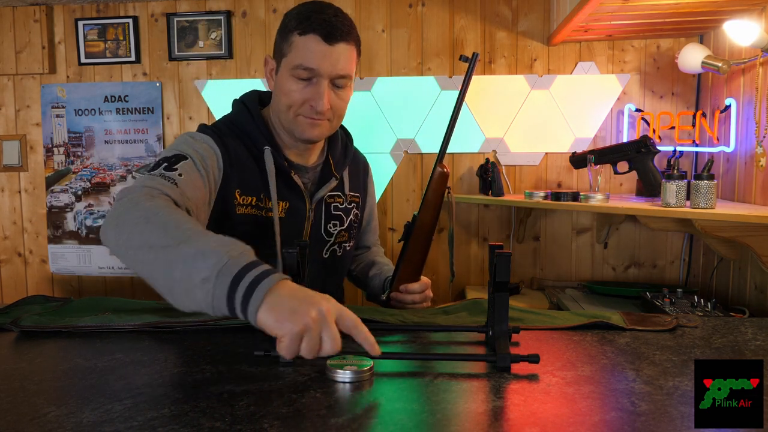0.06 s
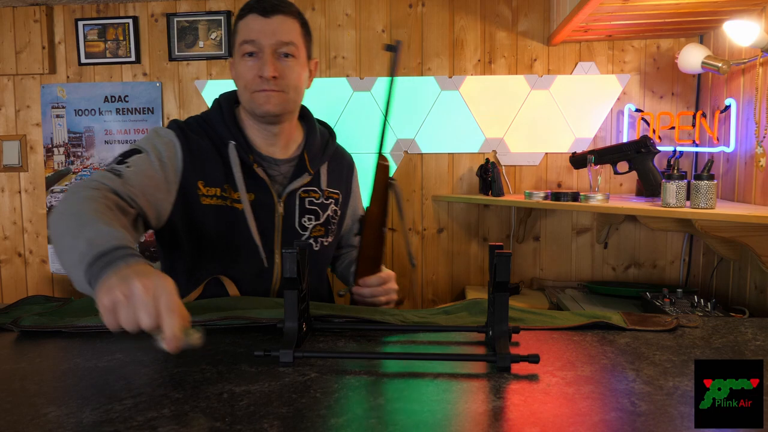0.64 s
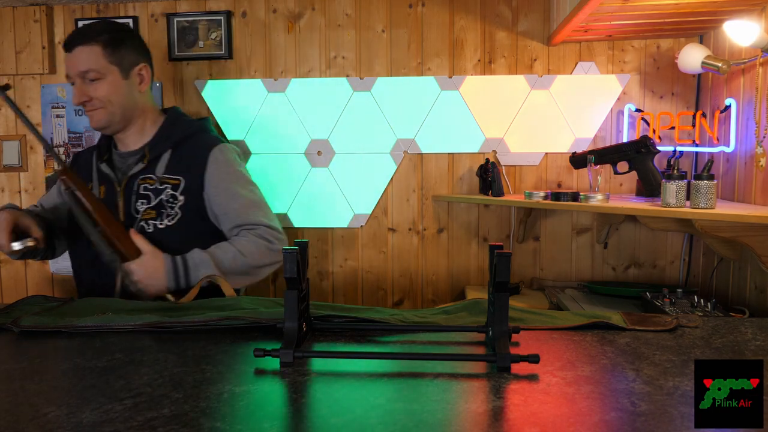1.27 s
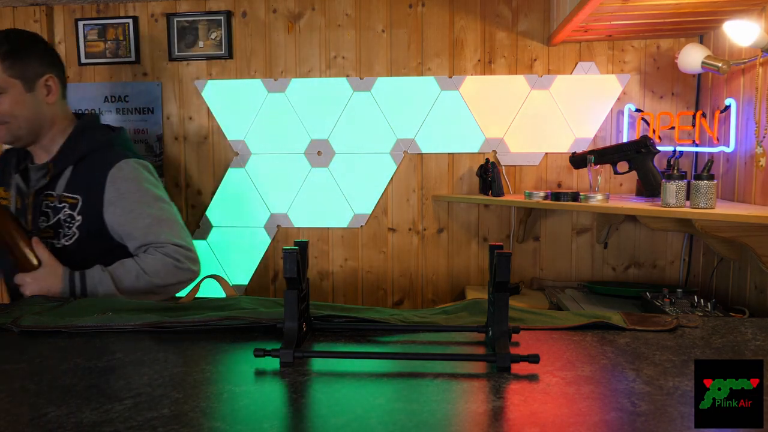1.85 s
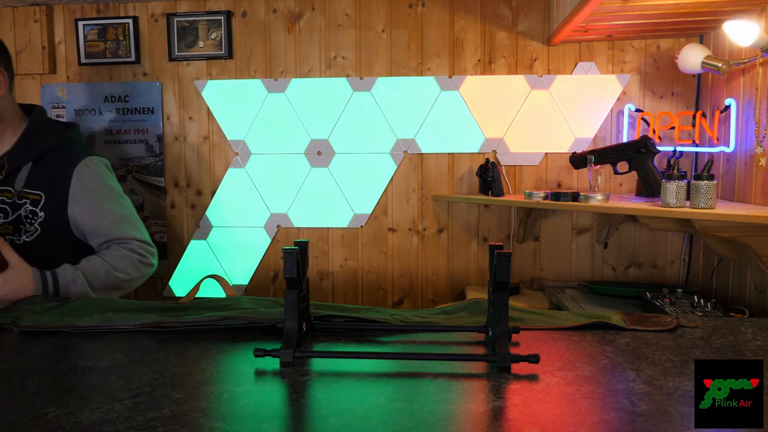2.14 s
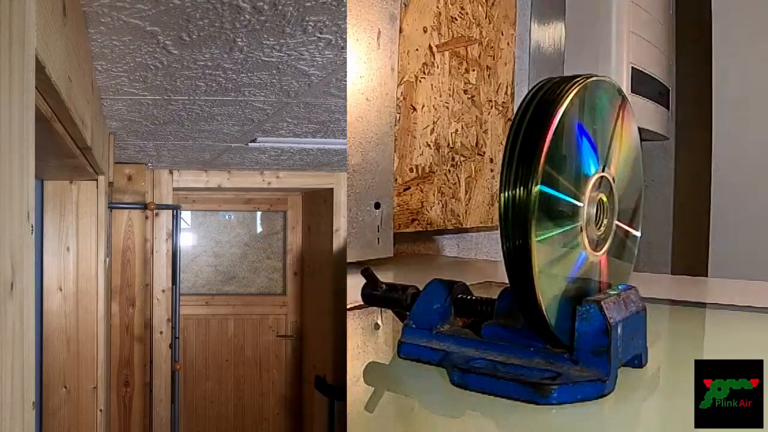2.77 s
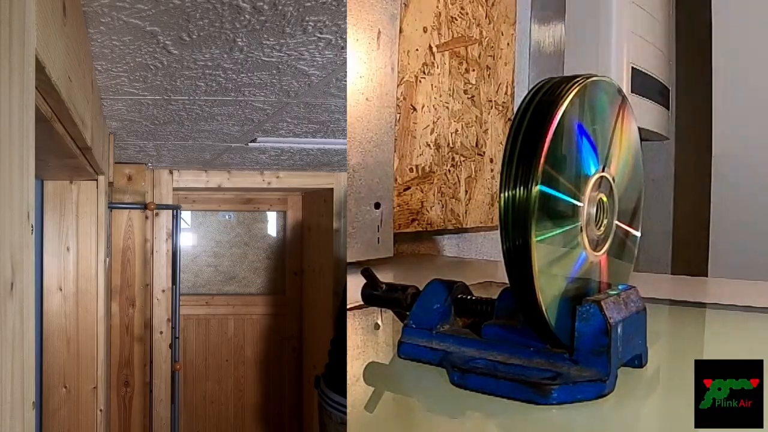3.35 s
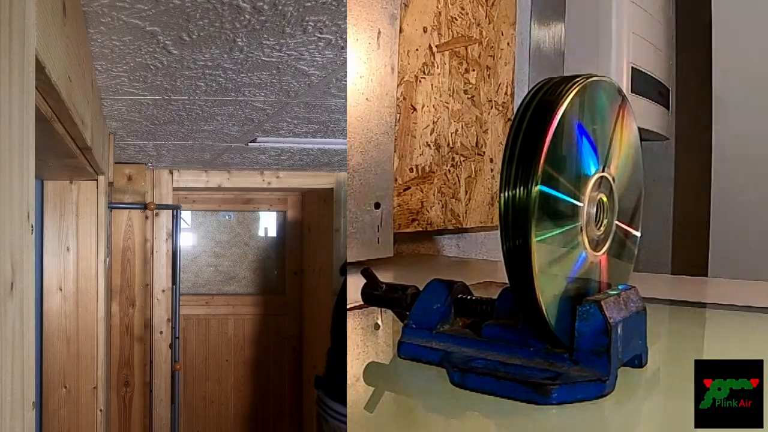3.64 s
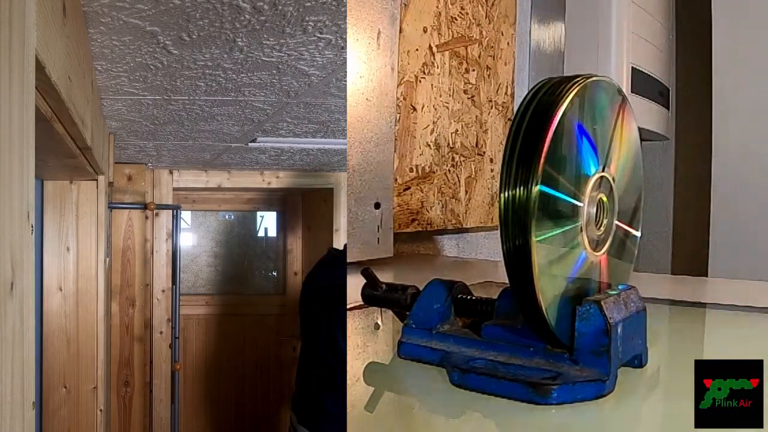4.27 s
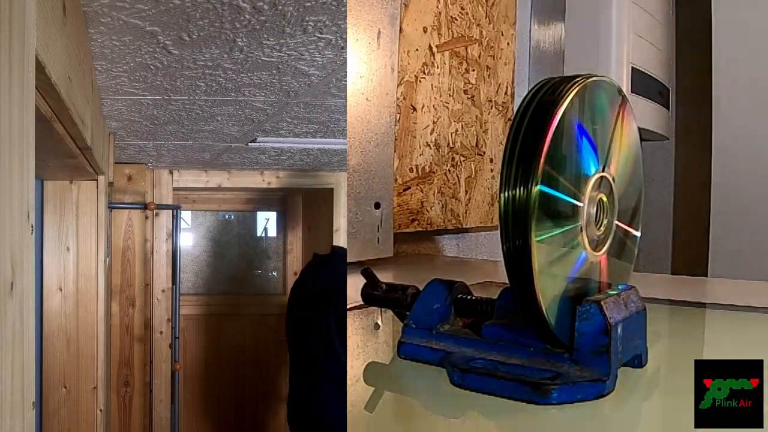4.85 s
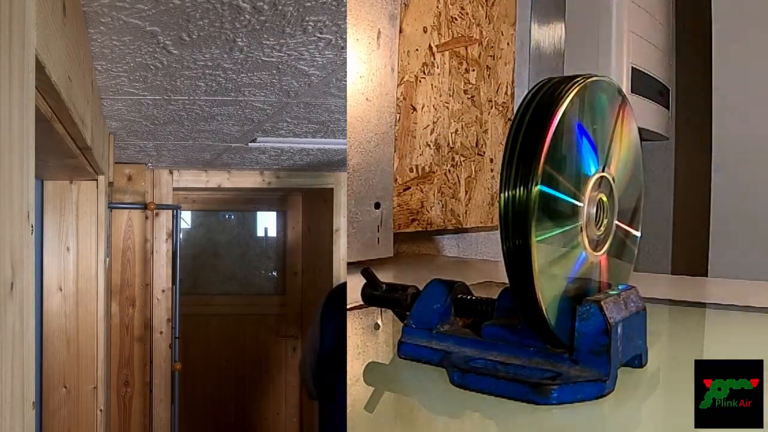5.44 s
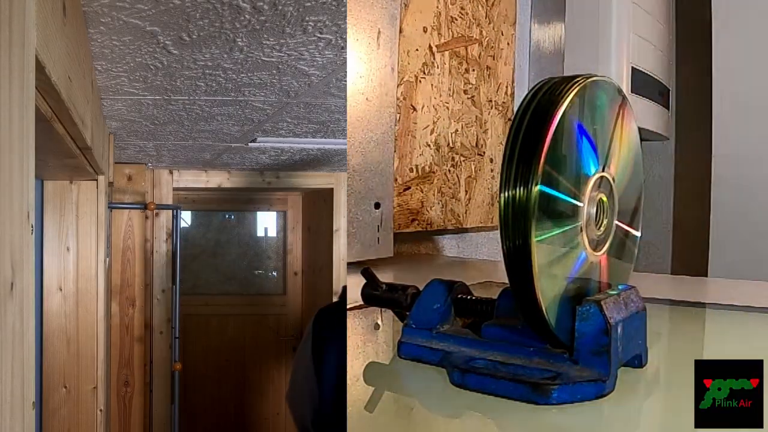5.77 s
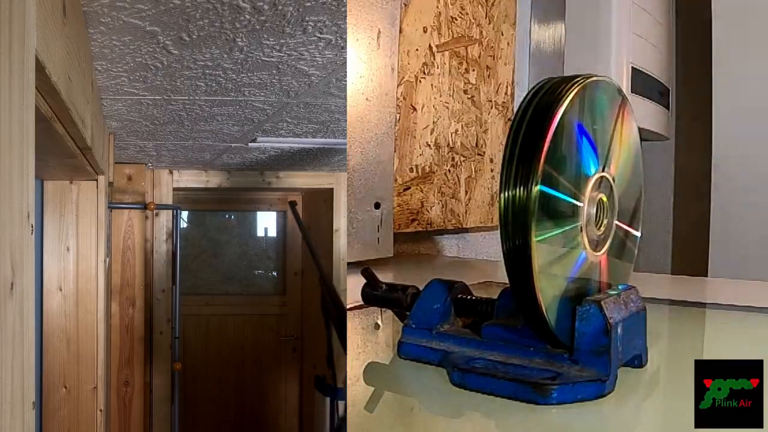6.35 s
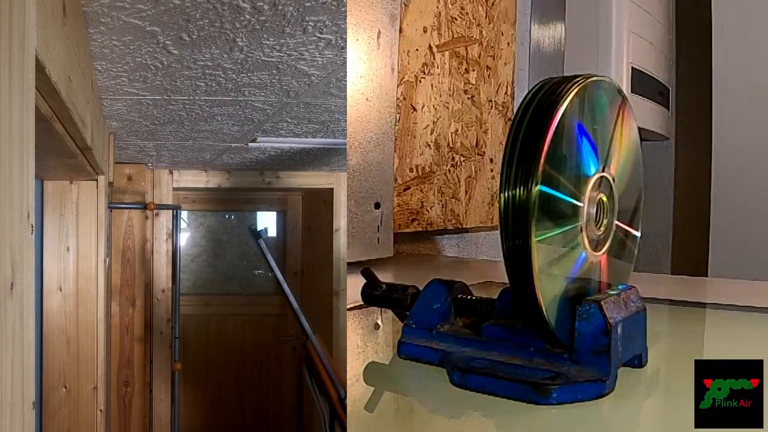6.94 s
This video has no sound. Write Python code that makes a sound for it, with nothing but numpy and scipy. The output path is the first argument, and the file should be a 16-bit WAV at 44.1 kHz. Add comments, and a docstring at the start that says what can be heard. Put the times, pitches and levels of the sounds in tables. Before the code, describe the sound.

A small tin of pellets scrapes and rattles softly, then an air rifle gives a hard knock, a metallic clatter and a latch snap.

```python
"""A pellet tin and an air rifle

In a small wood-panelled room a man slides a tin of pellets off a table and walks away with an air rifle. The
tin scrapes, pellets tick against its wall, sleeves rub his jacket, and steps and soft bumps thud. Cloth flicks
faintly now and then as he walks. Then the rifle is worked, and its steel parts strike, bounce and ring: one
hard knock, a quick clatter with a ping of the spring, a rattling lever and a latch snapping shut."""
import sys
import numpy as np
from scipy import signal
from scipy.fft import rfft, irfft
from scipy.io import wavfile
from scipy.ndimage import uniform_filter1d

SR = 44100
rng = np.random.default_rng(int(sys.argv[2]) if len(sys.argv) > 2 else 0)


def log_audio(samples):
    """Write samples as a 16-bit WAV file to the path given in sys.argv[1]."""
    # one column per channel
    frames = np.atleast_2d(samples).T
    # limit to full scale, then quantise
    limited = np.clip(frames, -1, 1)
    pcm = np.round(limited * 32767).astype(np.int16)
    wavfile.write(sys.argv[1], SR, pcm)


N = 308700
TIME = np.arange(N) / SR
HIT_SAMPLES = 16384
HIT_TIME = np.arange(HIT_SAMPLES) / SR

# Levels are relative: the functions set the final mix. A ring_s is the time to fade by 60 dB.
# the tone of the room's still air: pitch_hz, level_db
AIR_TONE = [(12, -14), (20, 5), (44, 9), (91, -3), (255, -2), (357, -4), (738, -7), (1220, -5),
            (1440, -10.5), (2990, -14), (7950, -22), (9950, -24.5), (13500, -28.5), (16000, -37)]

# faint stirring of the jacket between sleeve strokes: time_s, level_db
CLOTH_STIR = [(0, -70), (.3, -59.5), (1.85, -59.5), (3.45, -63.5), (4.4, -63.5), (5.4, -58.5), (7, -64)]
# sleeves brushing the jacket: fastest_s, length_s, rub_db, hiss_db
SLEEVE_STROKES = [(.285, .04, -56, -53), (.36, 0.13, -52, -52.5), (0.747, .1, -53.5, -68),
                  (0.902, 0.054, -54.5, -58), (1.17, 0.37, -51, -58), (1.483, 0.12, -55, -57.5),
                  (2.094, 0.19, -44.5, -44), (2.55, 0.48, -53, -55), (2.888, 0.099, -58, -41),
                  (3.011, 0.11, -48, -48), (3.183, 0.18, -49.5, -55), (3.64, 0.24, -58, -64.5),
                  (3.824, .11, -55, -55), (4.574, 0.17, -51.5, -54), (4.913, 0.097, -50, -58),
                  (5.105, 0.24, -55.5, -59), (5.64, 0.22, -53.5, -53.5), (5.772, 0.094, -50, -51),
                  (6.026, 0.17, -69, -58.5), (6.226, 0.075, -59.5, -57.5), (6.462, 0.13, -58, -54.5),
                  (6.561, 0.09, -53, -50), (6.689, 0.042, -54, -59), (6.88, 0.046, -55.5, -54)]
# the dull rub of the cloth: pitch_hz, level_db
RUB_TONE = [(100, -7.5), (250, -4), (400, -7.5), (750, -0.5), (1200, -2), (2200, -5.5), (4000, -18),
            (9000, -34)]
# the bright hiss of its fibres: pitch_hz, level_db
HISS_TONE = [(1200, -13), (2800, 2), (4500, 0.5), (8500, -1.5), (10500, -7.5), (14000, -9), (16000, -19.5)]

# steps and soft bumps: start_s, level_db, pitch_hz, fade_s, thump_db
STEPS_AND_BUMPS = [(.198, -34.5, 760, .019, -44.5), (.333, -31.5, 780, 0.011, -49),
                   (.824, -35, 570, 0.012, -43.5), (1.06, -44, 920, 0.032, -53),
                   (1.18, -35, 965, 0.0088, -49), (1.365, -44, 544, 0.03, -54),
                   (1.826, -41, 640, 0.025, -46.5), (2.518, -45.5, 1700, 0.036, -42.5),
                   (3.22, -49, 470, .035, -49), (3.579, -44.5, 1200, 0.0087, -50.5),
                   (4.98, -50, 120, .038, -61), (5.153, -44, 1200, 0.012, -43.5),
                   (5.17, -47, 110, 0.047, -58), (5.587, -46.5, 446, 0.032, -48),
                   (6.018, -48, 810, 0.013, -72), (6.111, -50.5, 705, 0.028, -49.5),
                   (6.676, -49.5, 1450, 0.031, -57)]
# faint, bright flicks of cloth: start_s, level_db
SMALL_TICKS = [(2.272, -41.5), (3.338, -50), (3.731, -46)]
# how long the room echoes, from bass to treble: pitch_hz, ring_s
ROOM_ECHO = [(100, 0.53), (300, 0.4), (800, 0.28), (2000, 0.29), (6000, 0.3), (14000, 0.31)]

# the tin sliding over the table: time_s, level_db
TIN_SLIDE = [(.252, -59), (.262, -44.5), (.285, -42), (.32, -41), (.34, -33.5), (.356, -40), (.40, -51.5),
             (.43, -59)]
# the tone the tin's body gives the scrape: pitch_hz, level_db
SLIDE_TONE = [(120, -33), (230, 4), (400, -20), (580, -4), (730, 6), (830, 7), (1070, -21), (1380, 3.5),
              (1800, -4.5), (2100, -6), (2500, -8.5), (4500, -14.5), (9000, -16), (15000, -37)]
# the loudest pellet ticks: start_s, level_db, brightness_db_per_octave
PELLET_HITS = [(.2624, -42.5, 6), (.440, -33.5, 0), (.4909, -37.5, 2.5), (.5085, -35, 2), (.5235, -40, 0.5),
               (.5495, -36.5, 2), (.6635, -38.5, -1.5), (.7039, -35.5, 0), (.914, -45, -1), (.9498, -44, 1),
               (.9967, -39, 1.5), (1.0471, -38.5, -1), (1.1115, -39.5, -4), (1.1469, -39.5, 2),
               (1.1808, -40, -8), (1.226, -38.5, -9), (1.4293, -36, -3), (1.438, -38.5, -6),
               (1.4642, -43, -3), (1.5694, -41.5, -2), (1.5914, -34, -3.5), (1.6248, -39, -2)]
# the tone of a pellet hitting the tin: pitch_hz, level_db
PELLET_TONE = [(300, -29), (800, -4.5), (1600, -0.5), (3200, 3), (4000, 0.5), (5500, 4), (8800, 3),
               (10500, -4), (15500, -11.5)]
# the notes the tin rings with: pitch_hz, level_db, ring_s
TIN_NOTES = [(727, 0.5, 0.21), (3040, -13, 0.18), (3020, 0, 0.11), (3390, 7, 0.064), (5370, -7, .12),
             (6500, -17, .12), (6800, -16, .1), (8070, 2, 0.061), (9300, -3, .07)]
# fingers close round the tin and muffle its ring: time_s, ring_db
FINGER_GRIP = [(.55, -6), (.68, -9), (1.4, -23)]
# loose pellets shifting as the tin is carried: time_s, level_db
PELLET_SHIFT = [(.42, -68), (.47, -55.5), (.6, -79), (.7, -53), (.92, -48.5), (1.3, -52.5), (1.5, -50),
                (1.72, -56)]
# the tone of the shifting pellets: pitch_hz, level_db
SHIFT_TONE = [(1500, -16), (3200, -6), (4200, -2), (5500, -0.5), (7500, -5), (9000, 1.5), (10200, -14),
              (15500, -13)]

# the rifle's hard knock: start_s, level_db, brightness_db_per_octave
KNOCK_HITS = [(2.6041, -13, 2), (2.6129, -24, -2), (2.636, -23.5, -0.5)]
# the tone of that knock: pitch_hz, level_db
KNOCK_TONE = [(30, -32), (55, -14), (85, -11), (135, -18), (215, -1), (370, -9.5), (600, 3.5), (740, -3),
              (900, 1), (1080, -7.5), (1400, 1), (2000, -9), (4200, -13.5), (7200, -11.5), (10500, -21.5),
              (16000, -36)]
# the notes the knock sets ringing: pitch_hz, level_db, ring_s
KNOCK_NOTES = [(211, 0.5, 0.14), (500, -5, .16), (630, -3, .13), (900, -6, .15), (1405, 0, 0.096),
               (1700, 4, .1), (2500, 0, 0.17), (4100, -14, .12), (5600, -11, .11), (6500, -9, .14),
               (7580, -1, 0.083), (8650, 1, 0.091)]
# the clatter of the action (the rifle's moving parts): start_s, level_db, brightness_db_per_octave
ACTION_HITS = [(4.0878, -13, 1.1), (4.0905, -13.5, 1), (4.1003, -11.8, 0.7), (4.1235, -18, -1),
               (4.136, -18.5, -0.5), (4.152, -19, -2.5), (4.1788, -12.5, -0.5), (4.2243, -16.5, -0.5),
               (4.243, -24, -2), (4.2495, -18.5, -1), (4.259, -20.5, 0.3)]
# the tone of that clatter: pitch_hz, level_db
ACTION_TONE = [(60, -47), (130, -30), (390, -23), (510, -11.5), (730, -15), (950, -5.5), (1120, -11.5),
               (1650, 1), (2100, -7.5), (3200, -12), (4800, -22), (5600, -32), (7000, -23.5), (11000, -41),
               (16000, -55)]
# the notes the action rings with: pitch_hz, level_db, ring_s
ACTION_NOTES = [(516, -21, 0.4), (630, -8.5, 0.32), (988, 6, .17), (978, -19, 0.24), (1200, 6, 0.173),
                (1440, 1, 0.26), (1620, -22, .2), (1653, -1.5, 0.073), (1760, -12, 0.18), (1890, -1, 0.17),
                (2256, -4, 0.2), (2450, 5, 0.12), (2740, -2, 0.137), (3210, 6, 0.077), (4370, -8.5, 0.058),
                (4970, -1, 0.054), (6700, -19, 0.29)]
# the lever rattling as it is moved: start_s, level_db, brightness_db_per_octave
LEVER_HITS = [(5.2400, -33, 0), (5.2455, -32, -1.5), (5.2605, -32, -3.5), (5.293, -47, -12),
              (5.315, -47, -13)]
# the tone of that rattle: pitch_hz, level_db
LEVER_TONE = [(200, -32), (400, -17.5), (530, -11), (950, -5), (1160, -15), (1500, 6), (1750, -2),
              (2050, -12), (2450, -10), (3100, -21), (4100, -35), (15000, -56)]
# the notes the lever rings with: pitch_hz, level_db, ring_s
LEVER_NOTES = [(890, 1, 0.29), (1430, -7, 0.15), (1590, -9, 0.18), (1770, -4, 0.13), (2326, 4, 0.16)]
# the latch snapping shut: start_s, level_db, brightness_db_per_octave
LATCH_HITS = [(5.335, -50, 13), (5.3502, -31.5, 2), (5.354, -24.5, 0.5), (5.374, -35.5, -3),
              (5.397, -41, -10)]
# the tone of that snap: pitch_hz, level_db
LATCH_TONE = [(150, -16), (380, -21), (540, -7.5), (950, -6), (1150, -3), (1550, 4.5), (2300, -7),
              (3300, -12.5), (4100, -26.5), (5000, -20.5), (8000, -34.5), (15000, -44)]


def gain(db):
    """Turn decibels into a number to multiply a sound by."""
    return 10 ** (np.asarray(db) / 20)


def unit_level(sound):
    """Scale a sound to an average (rms) level of 1."""
    return sound / np.sqrt(np.mean(sound ** 2))


def unit_hit(sound):
    """Give a hit as much energy as 10 ms of sound at level 1."""
    return sound / np.sqrt(np.sum(sound ** 2) / (SR / 100))


def loudness_curve(points):
    """Join (time_s, level_db) points into a gain that is silent before and after them."""
    return gain(np.interp(TIME, *np.transpose(points), left=-120, right=-120))


def at_pitch(points, hz):
    """Read between (pitch_hz, value) points, with octaves evenly spaced."""
    pitches, values = np.transpose(points)
    return np.interp(np.log(hz + 1), np.log(pitches), values)


def shape_tone(sound, tone, brightness=0):
    """Filter a sound to a tone, adding `brightness` dB for each octave above 500 Hz."""
    size = len(sound)
    hz = np.arange(size // 2 + 1) * SR / size
    db = at_pitch(tone, hz) + brightness * np.log2(np.clip(hz, 500, None) / 500)
    # folding the cepstrum makes the filter ring after a hit, not before it
    cepstrum = irfft(np.log(gain(db)))
    cepstrum[1:size // 2] *= 2
    cepstrum[size // 2 + 1:] = 0
    return irfft(rfft(sound) * np.exp(rfft(cepstrum)), size)


def add(track, start_s, sound):
    """Mix a sound into the track at a given time."""
    start = max(int(start_s * SR), 0)
    track[start:start + len(sound)] += sound[:N - start]


def die_away(t, ring_s):
    """A fade that drops 60 dB every ring_s seconds."""
    return np.exp(-np.log(1000) * t / ring_s)


def air():
    """The quiet room rumbles and hisses faintly."""
    return gain(-60) * unit_level(shape_tone(rng.standard_normal(N), AIR_TONE))


def friction(tone, grain_db, flutter_db):
    """Rubbing is many tiny slips of uneven size, with the tone of the thing being rubbed."""
    slips = rng.standard_normal(N) * gain(grain_db * np.minimum(rng.exponential(size=N), 7))
    hold = int(SR / 60)  # the level glides to a new random value 60 times a second
    levels = np.repeat(rng.standard_normal(N // hold + 1), hold)
    flutter = unit_level(uniform_filter1d(levels, hold)[:N])
    return unit_level(shape_tone(slips, tone)) * gain(flutter_db * flutter)


def sleeve_speed(t, fastest_s, length_s):
    """A sleeve speeds up quickly and slows down more gently."""
    from_peak = (t - fastest_s) / length_s
    rise = (from_peak / 0.47) ** 2
    fall = np.abs(from_peak) ** 1.33
    return np.exp(-np.minimum(np.where(from_peak < 0, rise, fall), 20))


def jacket():
    """Sleeves brush the body: each stroke makes a dull rub of cloth and a fine hiss of fibres."""
    t = TIME[::100]
    stir = gain(np.interp(t, *np.transpose(CLOTH_STIR)))
    rub_power, hiss_power = stir ** 2, (gain(0.5) * stir) ** 2
    for fastest_s, length_s, rub_db, hiss_db in SLEEVE_STROKES:
        speed = sleeve_speed(t, fastest_s, length_s)
        rub_power += (gain(rub_db) * speed) ** 2
        hiss_power += (gain(hiss_db) * speed) ** 2
    rub = friction(RUB_TONE, grain_db=2.6, flutter_db=1.95) * np.interp(TIME, t, np.sqrt(rub_power))
    hiss = friction(HISS_TONE, grain_db=1.8, flutter_db=0.5) * np.interp(TIME, t, np.sqrt(hiss_power))
    return gain(1.0) * rub + gain(1.14) * hiss


def tap(db, hz, fade_s):
    """A light touch on floor, table or rifle: a fading puff of noise around one pitch."""
    tone = [(hz / 6, -34), (hz / 2, -13), (hz, 0), (hz * 2, -14), (hz * 8, -38), (hz * 30, -60)]
    noise = unit_level(shape_tone(rng.standard_normal(HIT_SAMPLES), tone))
    soft_start = 1 - np.exp(-HIT_TIME / 0.0019)
    return gain(db) * noise * soft_start * np.exp(-HIT_TIME / fade_s)


def bumps_and_ticks():
    """Steps and bumps over a low wooden thump, small bright flicks of cloth, and a boom after the hard knock."""
    track = np.zeros(N)
    for start_s, db, hz, fade_s, thump_db in STEPS_AND_BUMPS:
        add(track, start_s, tap(db, hz, fade_s) + tap(thump_db, hz=229, fade_s=0.027))
    for start_s, db in SMALL_TICKS:
        add(track, start_s, tap(db, hz=3900, fade_s=0.011))
    boom_s = KNOCK_HITS[0][0] + 0.0073
    add(track, boom_s, tap(db=-44.5, hz=75.4, fade_s=0.07))
    return room(track, echo_db=-8)


def room(sound, echo_db, build_s=0.0021):
    """Close wooden walls add a blur of echoes that builds fast; the bass lingers longest."""
    t = np.arange(2 * HIT_SAMPLES) / SR
    hz = np.arange(HIT_SAMPLES + 1) * SR / len(t)
    noise_spectrum = rfft(rng.standard_normal(len(t)))
    tail = np.zeros(len(t))
    for band_hz, ring_s in ROOM_ECHO:
        band = at_pitch([(pitch, float(pitch == band_hz)) for pitch, _ in ROOM_ECHO], hz)
        tail += irfft(noise_spectrum * band) * die_away(t, ring_s)
    tail *= 1 - np.exp(-(t / build_s) ** 2)
    tail /= np.sqrt(np.sum(tail ** 2))
    return sound + gain(echo_db) * signal.fftconvolve(sound, tail)[:N]


def pellet_tin():
    """The tin scrapes off the table while pellets shift inside it and tick against its wall."""
    scrape = friction(SLIDE_TONE, grain_db=3.1, flutter_db=3.5) * loudness_curve(TIN_SLIDE)
    hits = PELLET_HITS + stray_pellets()
    ring_db = np.interp([hit[0] for hit in hits], *np.transpose(FINGER_GRIP))
    ticks = metal_hits(hits, PELLET_TONE, TIN_NOTES, chatter_s=0.00243, snap=0.11, ring_db=ring_db,
                       pitch_spread=0.0234, tone_spread_db=5)
    return room(scrape + gain(-4.5) * ticks + gain(-8) * shifting_pellets(), echo_db=-7)


def metal_chatter(fade_s):
    """Metal chatters on metal for a few milliseconds, about equally strong at every pitch."""
    burst = rng.standard_normal(HIT_SAMPLES) * np.exp(-HIT_TIME / fade_s)
    for _ in range(4):
        burst = irfft(np.exp(1j * np.angle(rfft(burst))))  # even out the pitches
        burst *= np.exp(-(HIT_TIME / fade_s / 4) ** 2)  # make it short again
    return unit_hit(burst)


def metal_hits(hits, tone, notes, chatter_s, snap, ring_db, pitch_spread=0.0038, tone_spread_db=0.9):
    """Each hit is a sharp click and a brief chatter, and sets the metal's own notes ringing."""
    track = np.zeros(N)
    click = snap * unit_hit(1. * (HIT_TIME == 0))
    hz, note_db, ring_s = np.transpose(notes)[:, :, None]
    for (start_s, db, brightness), hit_ring_db in zip(hits, np.broadcast_to(ring_db, len(hits))):
        # each hit lands on a new spot, so its tone and pitches vary
        spot_tone = [(pitch, level + tone_spread_db * rng.standard_normal()) for pitch, level in tone]
        contact = unit_hit(shape_tone(metal_chatter(chatter_s) + click, spot_tone, brightness))
        spot_hz = hz * (1 + pitch_spread * rng.standard_normal(hz.shape))
        phase = 2 * np.pi * (spot_hz * HIT_TIME + rng.random(hz.shape))
        strength = gain(note_db + brightness * np.log2(hz))
        ring = np.sum(strength * die_away(HIT_TIME, ring_s) * np.sin(phase), axis=0)
        add(track, start_s, gain(db) * (contact + gain(hit_ring_db) * unit_hit(ring)))
    return track


def stray_pellets(ticks_per_s=24, boost_db=3, scatter_db=2):
    """List faint hits on the tin's wall at random moments, harder when the pellets shift more."""
    shift_s, shift_db = np.transpose(PELLET_SHIFT)
    slots = np.arange(shift_s[0], shift_s[-1], 1 / ticks_per_s)
    lateness, size = rng.random((len(slots), 2)).T
    times = slots + lateness / ticks_per_s
    levels = np.interp(times, shift_s, shift_db) + boost_db + scatter_db * (2 * size - 1)
    return [(start_s, db, 1) for start_s, db in zip(times, levels)]


def shifting_pellets(collisions_per_s=450):
    """Loose pellets bump each other in hundreds of tiny collisions."""
    collisions = rng.standard_normal(N) * (rng.random(N) < collisions_per_s / SR)
    return unit_level(shape_tone(collisions, SHIFT_TONE)) * loudness_curve(PELLET_SHIFT)


def rifle():
    """Steel parts strike each other, bounce, and make the action and the stock ring."""
    knock = metal_hits(bounce(KNOCK_HITS), KNOCK_TONE, KNOCK_NOTES,
                       chatter_s=0.0039, snap=0.17, ring_db=-10.5)
    clatter = metal_hits(bounce(ACTION_HITS), ACTION_TONE, ACTION_NOTES,
                         chatter_s=0.0054, snap=0.41, ring_db=-10)
    lever = metal_hits(bounce(LEVER_HITS), LEVER_TONE, LEVER_NOTES,
                       chatter_s=0.0067, snap=0.13, ring_db=-9)
    latch = metal_hits(bounce(LATCH_HITS), LATCH_TONE, ACTION_NOTES,
                       chatter_s=0.0047, snap=0.26, ring_db=-10)
    track = room(knock, echo_db=-4)
    track += room(clatter + spring_ping(), echo_db=-3.5)
    track += room(lever + latch, echo_db=-4.5)
    return gain(-2.03) * track


def bounce(hits, delay_s=0.0062):
    """A steel part bounces once after each hit, weaker and duller."""
    return hits + [(start_s + delay_s, db - 5.5, brightness - 2) for start_s, db, brightness in hits]


def spring_ping(start_s=4.1788, hz=13100):
    """The spring's coils give one thin, high shimmer during the clatter."""
    tone = [(hz * 0.9, -40), (hz, 0), (hz * 1.1, -40)]
    shimmer = unit_level(shape_tone(rng.standard_normal(HIT_SAMPLES), tone))
    track = np.zeros(N)
    add(track, start_s, gain(-41) * shimmer * die_away(HIT_TIME, ring_s=0.21))
    return track


def scene():
    """Mix all the sounds into one channel."""
    return (pellet_tin() + bumps_and_ticks() + rifle() + jacket() + air())[None]


def record(dry):
    """Clip peaks at full scale and cut the highest treble."""
    treble_cut = signal.ellip(10, 0.2, 70, 15950, fs=SR, output="sos")
    return signal.sosfilt(treble_cut, np.clip(dry, -1, 1))


dry = scene()
out = record(dry)
log_audio(out)
```